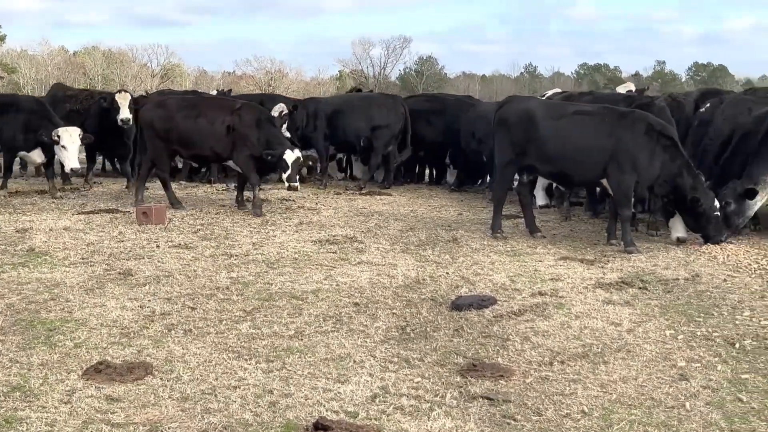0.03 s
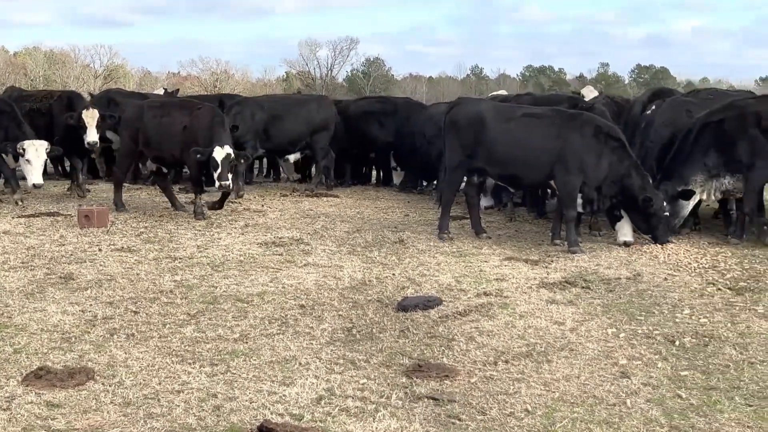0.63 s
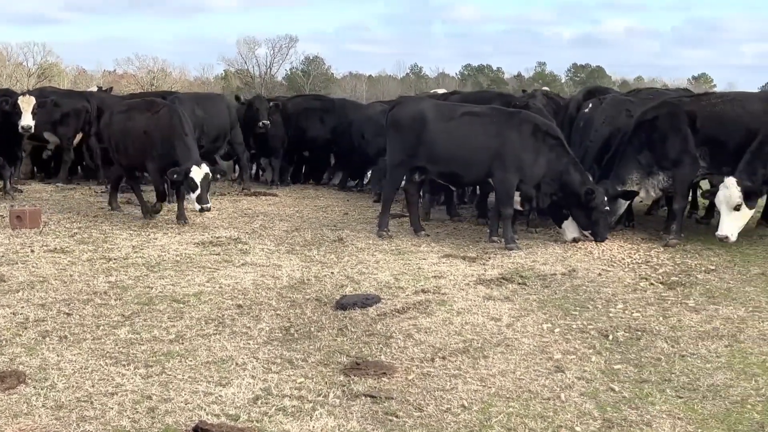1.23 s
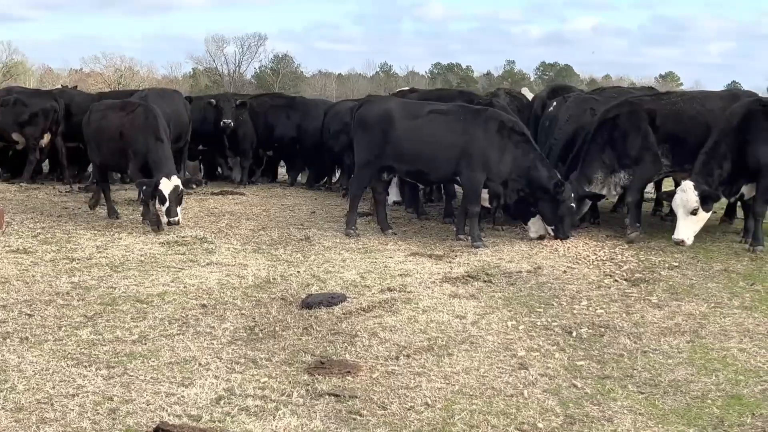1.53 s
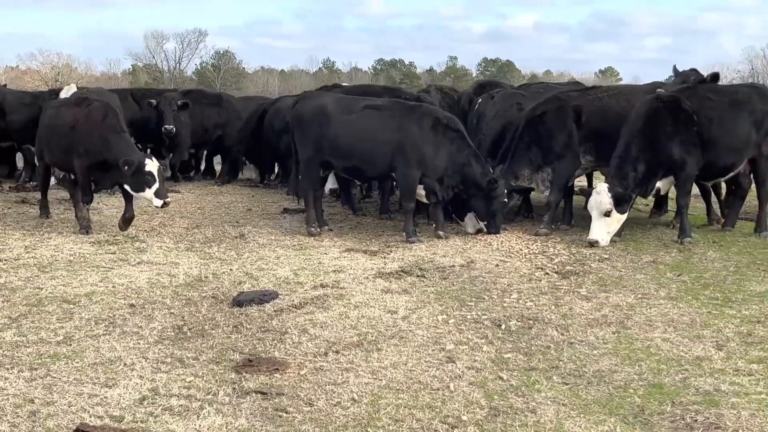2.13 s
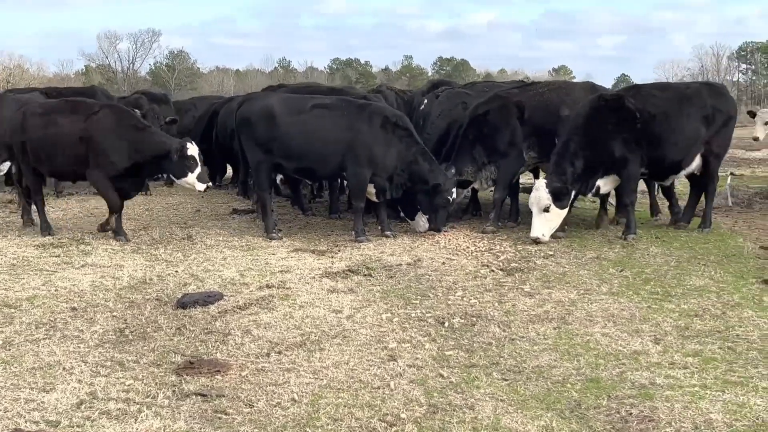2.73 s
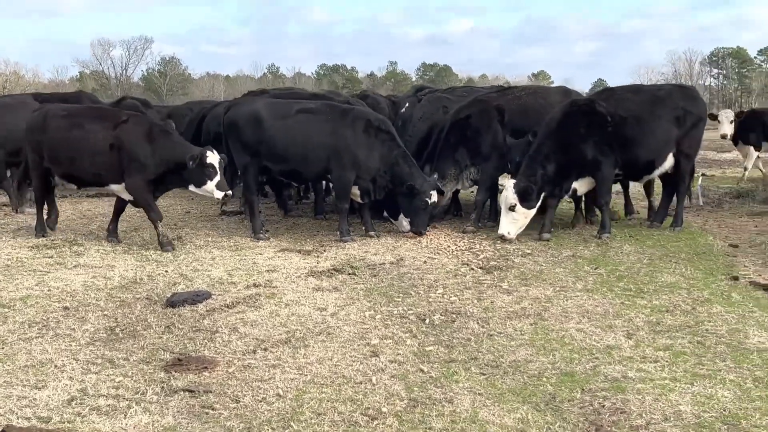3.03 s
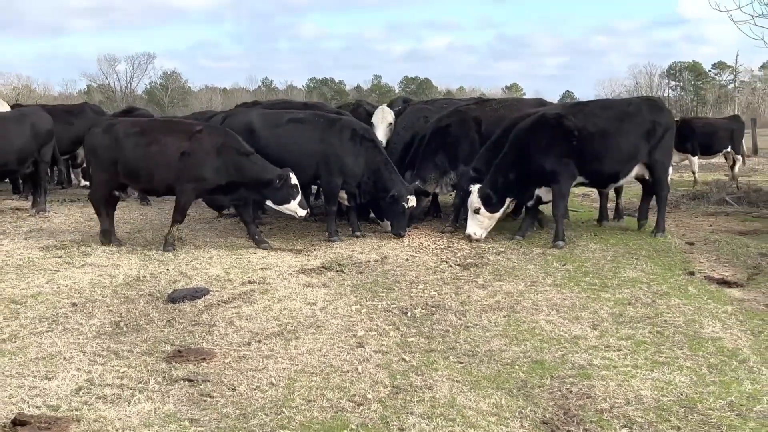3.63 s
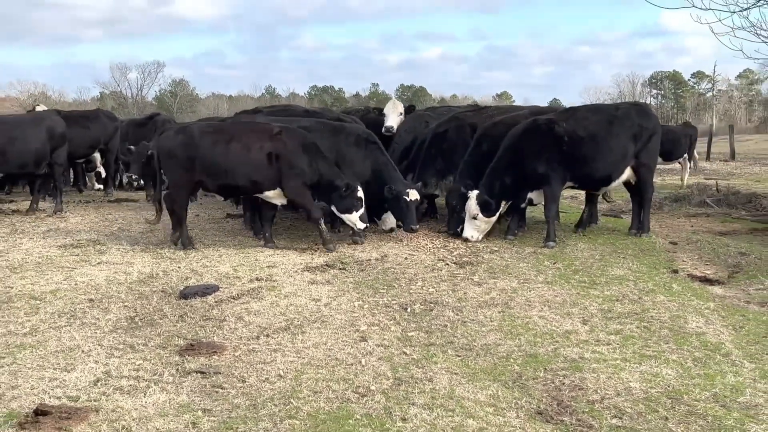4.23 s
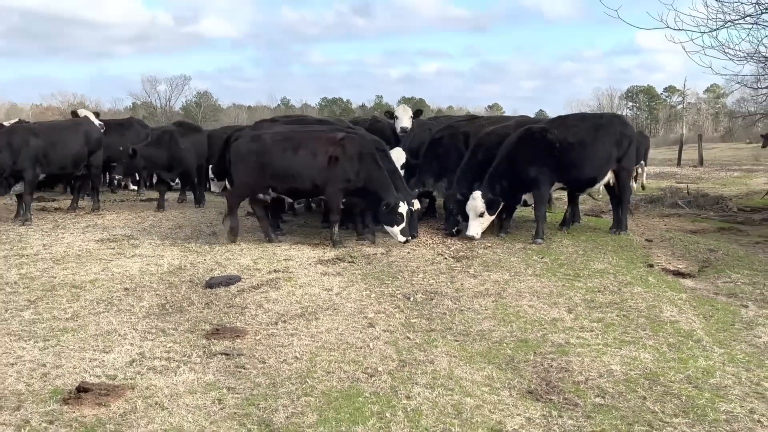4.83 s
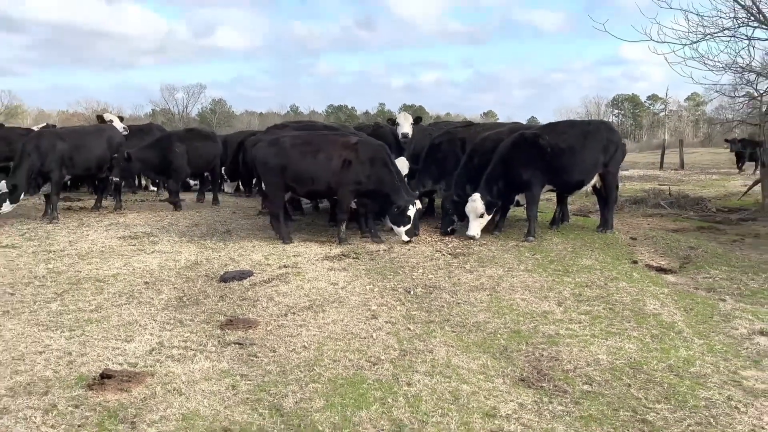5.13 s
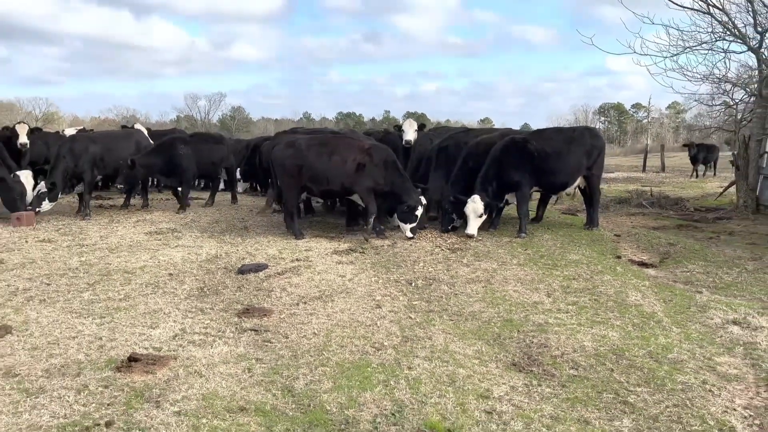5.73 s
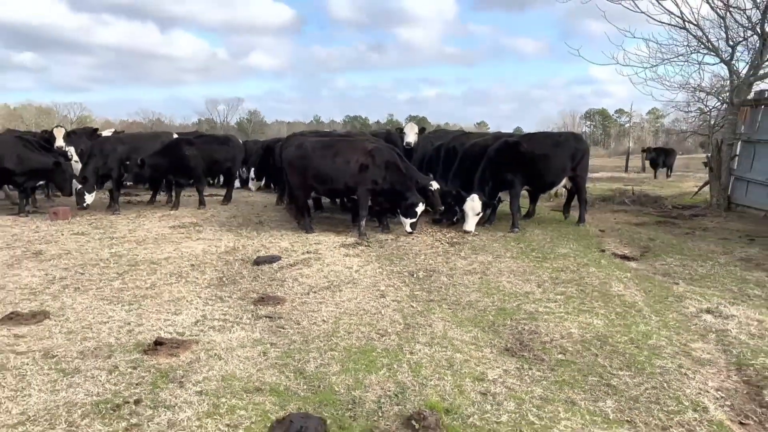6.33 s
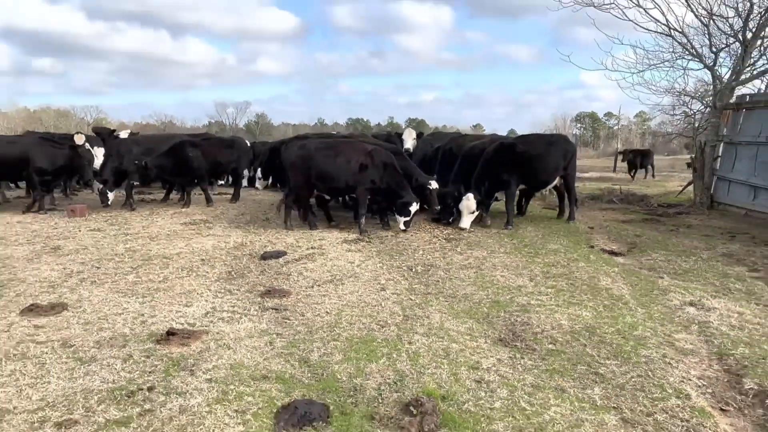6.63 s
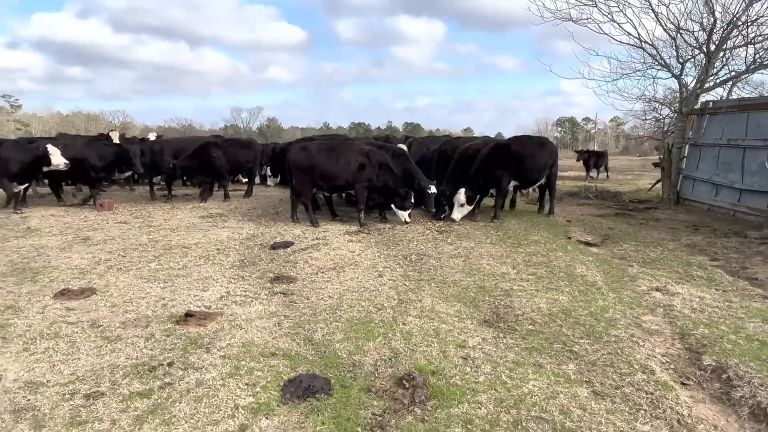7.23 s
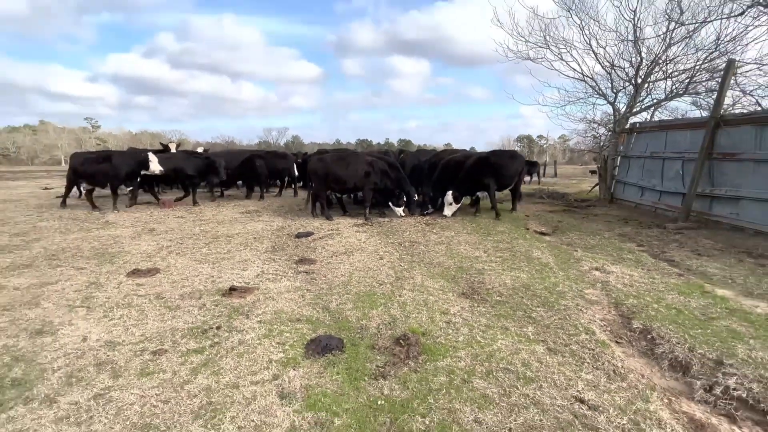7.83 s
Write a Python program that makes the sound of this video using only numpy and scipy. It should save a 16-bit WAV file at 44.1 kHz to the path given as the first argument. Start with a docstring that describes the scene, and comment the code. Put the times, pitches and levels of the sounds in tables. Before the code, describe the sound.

A quad bike's single-cylinder engine is heard from the seat as it crosses an open, dry pasture. It drones briefly, slows to a thudding idle with light metal clatter, and grows quieter, then picks up again with a rasp and a grinding whine. Low thumps come as it jolts over rough ground. A breeze rumbles on the microphone, loose parts tick, grass crackles faintly and small birds call far off.

```python
"""A dry pasture, heard from the seat of a quad bike with a single-cylinder four-stroke engine.
The bike slows to a thudding idle, then picks up again. Each engine cycle puffs gas through the
silencer and shakes the metal; under load the drive grinds and whines. Tyres swish through grass,
the bike jolts over rough ground, loose parts tick, a breeze rumbles and small birds call far off."""
import sys
import numpy as np
from scipy import signal
from scipy.fft import rfft, irfft, next_fast_len
from scipy.io import wavfile
from scipy.ndimage import uniform_filter1d

SR = 44100
rng = np.random.default_rng(int(sys.argv[2]) if len(sys.argv) > 2 else 0)


def dump_mix(stems):
    """Bounce the given channels to the path in sys.argv[1] as a 16-bit WAV at rate SR."""
    frames = np.atleast_2d(stems).T  # one column per channel
    limited = np.clip(frames, -1, 1)  # hard clip at full scale
    pcm = np.round(limited * 32767).astype(np.int16)
    wavfile.write(sys.argv[1], SR, pcm)


N = 351918
TIME = np.arange(N) / SR
SIZE = next_fast_len(N + SR // 10, True)
FREQ = np.maximum(np.arange(SIZE // 2 + 1) * SR / SIZE, 1)
CYCLE_DEG, MAX_CYCLES = 720, 256  # the crank turns twice for each firing


def undb(db):
    """Turn decibels into a gain."""
    return 10 ** (np.asarray(db) / 20)

def curve(table, column=1):
    """Join a table's points over time with straight lines."""
    table = np.asarray(table)
    return np.interp(TIME, table[:, 0], table[:, column])

def across(points):
    """Spread (Hz, value) points over every frequency."""
    hz, value = np.transpose(points)
    return np.interp(np.log(FREQ), np.log(hz), value)

def through(x, response):
    """Filter a sound with one gain for each frequency."""
    return irfft(rfft(x, SIZE) * response, SIZE)[..., :N]

def resonance(hz, width_hz):
    """A filter that rings at one pitch; the narrower, the longer it rings."""
    return 1 / (1 + 1j * (FREQ ** 2 - hz ** 2) / (FREQ * width_hz))

def unit(x, band_hz=(1, SR)):
    """Scale a sound so its mono mix has an rms level of 1 within a band."""
    mid = np.atleast_2d(x).mean(axis=0)
    return x / np.std(through(mid, (FREQ > band_hz[0]) & (FREQ < band_hz[1])))

def walk(rate):
    """A random wobble of about 1 that glides to a new value `rate` times a second."""
    hold = max(int(SR / rate), 1)
    steps = uniform_filter1d(np.repeat(rng.standard_normal(N // hold + 1), hold), hold)[:N]
    return steps / np.std(steps)

def swells(table, column):
    """Total power of events that rise and fall in a bell shape."""
    t = TIME[::64]
    power = sum(undb(row[column]) ** 2 * np.exp(-((t - row[0]) / row[1]) ** 2) for row in table)
    return np.interp(TIME, t, power)

def wide_noise(width, n=N):
    """Noise shared by left and right, plus some of their own."""
    return rng.standard_normal(n) + width * rng.standard_normal((2, n))

def stereo_noise(envelope, colour, likeness, balance):
    """Noise that follows an envelope, shaped in tone and spread left and right."""
    alike = np.clip(across(likeness), -.8, .99)
    lean = undb(across(balance) / 2)
    gain = undb(across(colour)) / np.sqrt(lean ** 2 + lean ** -2 + 2 * alike)
    mid, side = envelope * rng.standard_normal((2, N))
    centre = through(mid, gain * np.sqrt(1 + alike) * [lean, 1 / lean])
    return centre + through(side, gain * np.sqrt(1 - alike) * [lean, -1 / lean])

def tone(pitch_hz):
    """A sine wave that follows a changing pitch."""
    return np.sin(2 * np.pi * np.cumsum(pitch_hz) / SR)

def add(track, start_s, sound):
    """Mix a short sound into a track."""
    start = max(int(start_s * SR), 0)
    track[..., start:start + sound.shape[-1]] += sound[..., :N - start]

def strengths(scatter_db):
    """One random gain for each engine cycle."""
    return undb(scatter_db * rng.uniform(-1, 1, size=MAX_CYCLES))

def rattling(cycle, taps, loose, settle_s):
    """Loose metal taps a little early or late, harder or softer, and chatters briefly."""
    strikes = np.zeros(N)
    for angle, strength in taps:
        angles = angle + 9 * rng.standard_normal(MAX_CYCLES)
        at = np.searchsorted(cycle, np.arange(MAX_CYCLES) + angles / CYCLE_DEG)
        inside = (at > 0) & (at < N)
        strikes[at[inside]] += strength * strengths(scatter_db=4)[inside]
    fade = np.exp(-1 / (settle_s * SR))
    chatter = np.sqrt(signal.lfilter([1 - fade], [1, -fade], strikes ** 2 + 1e-18))
    return strikes + loose * chatter * rng.standard_normal((2, N))

def ringing(shake, rings, wander_db):
    """Shaken metal rings; each pitch comes and goes as the parts shift."""
    return unit(sum(through(shake, undb(db) * resonance(hz, width) ** 2) * undb(wander_db * walk(4))
                    for hz, width, db in rings))

# Engine speed. Each row: time in seconds, firings per second.
ENGINE_SPEED = [(0.0, 21.75), (0.45, 22.8), (0.62, 21.49), (0.75, 20.22), (0.87, 18.12), (1.07, 16.91),
                (1.75, 15.95), (2.0, 16.16), (2.2, 16.24), (2.4, 15.47), (2.65, 15.47), (3.1, 15.41),
                (3.65, 15.24), (4.0, 15.44), (4.45, 14.91), (5.2, 14.43), (5.7, 15.22), (6.0, 16.26),
                (6.25, 19.94), (6.48, 21.64), (6.75, 19.7), (7.1, 22.51), (7.42, 23.05), (7.68, 23.12),
                (7.98, 22.03)]

def revs(idle_hz=15.5):
    """Engine speed in octaves above idle: 1 means twice as fast."""
    return np.log2(curve(ENGINE_SPEED) / idle_hz)

# Bird calls. Each row: start in seconds, length in seconds, pitch in Hz, fall in octaves, level in dB.
WHISTLES = [(3.345, .18, 2670, .24, -61), (3.83, .17, 2650, .05, -61.5)]

def whistling_bird(rise_oct=.14):
    """Two soft whistles rise, hold and drop at the end."""
    out = np.zeros(N)
    for start, length, hz, fall, db in WHISTLES:
        progress = np.linspace(0, 1, int(length * SR))
        bend = -rise_oct * (1 - progress) ** 2 - fall * progress ** 6
        pitch = hz * 2 ** (bend + .013 * walk(270)[:len(progress)])
        add(out, start, undb(db) * np.sqrt(4 * progress * (1 - progress)) * tone(pitch))
    return out

# Bird trills. Each row: start in seconds, length in seconds, pitch in Hz, level in dB.
TRILLS = [(.472, .05, 6460, -60), (3.575, .045, 5900, -61), (3.775, .065, 6330, -57),
          (4.035, .085, 5420, -60)]

def trilling_bird(pips_per_s=50, sweep_oct=.082):
    """A smaller bird sings thin runs of quick, falling pips that fade."""
    out = np.zeros(N)
    for start, length, hz, db in TRILLS:
        t = TIME[:int(length * SR)]
        pip = t * pips_per_s % 1
        pitch = hz * 2 ** (sweep_oct * (.5 - pip) + .043 * walk(1500)[:len(t)])
        pulses = .49 + 1.36 * np.sin(np.pi * pip) ** 2
        add(out, start, undb(db) * np.sqrt(1 - t / length) * pulses * tone(pitch))
    return out

# Small cracks. Each row: start in seconds, peak level in dB, pitch in Hz.
TICKS = [(1.481, -38, 3280), (1.527, -44, 3420), (1.62, -40.5, 1940), (1.987, -47, 6900),
         (2.155, -44, 4800), (2.56, -30.5, 1750), (2.819, -33.5, 2100), (3.195, -47, 9000),
         (3.704, -45, 3900), (4.645, -45, 4440), (4.922, -58, 11000), (5.05, -52, 7300), (5.327, -37, 2300),
         (5.33, -43, 4350), (5.885, -38, 4100), (6.728, -50, 10500), (6.759, -43, 9500),
         (6.834, -42.5, 11100), (7.399, -46.5, 10000)]

def ticks():
    """Loose parts and snapping stalks make brief, bright bursts of noise."""
    out, t = np.zeros((2, N)), TIME[:SR // 20]
    for start, db, hz in TICKS:
        burst = wide_noise(.6, len(t)) * np.exp(-t / .0031)
        band = signal.butter(2, [hz * .7, hz * 1.13], "band", fs=SR, output="sos")
        crack = signal.sosfilt(band, burst)
        add(out, start, crack / np.abs(crack).max() * undb(db))
    return out

def boom(length_s=.03, start_hz=102.5, end_hz=53.5):
    """One short, low boom slides down in pitch at the very start."""
    out, progress = np.zeros(N), np.linspace(0, 1, int(length_s * SR))
    pitch = start_hz * (end_hz / start_hz) ** progress
    swell = np.sqrt(4 * progress * (1 - progress)) * (1 - progress / 2)
    add(out, 0, undb(-24.5 + 2 * walk(27)[:len(progress)]) * swell * tone(pitch))
    return out

def slap(hz):
    """One quick swing of pressure; the higher its pitch, the shorter it is."""
    turns = hz * TIME[:SR // 10]
    return -6.5 * np.sin(2 * np.pi * turns) * turns * np.exp(-turns / .49)

# Jolts. Each row: time in seconds, thump level in dB, slap level in dB, slap pitch in Hz.
JOLTS = [(.009, -12.5, -36, 260), (.036, -10.5, -43, 250), (.057, -17, -33.5, 285),
         (1.889, -16, -30.5, 332), (1.91, -27, -26.5, 540), (1.923, -8, -21, 297), (1.971, -15, -35, 270),
         (2.161, -11.5, -25.5, 280), (2.198, -23, -38, 260), (2.615, -17, -30, 400),
         (2.646, -13.5, -20.5, 415), (2.662, -5.5, -25, 304), (2.685, -14, -21, 347),
         (2.891, -16.5, -22, 266), (2.957, -24, -24.5, 290), (3.01, -20, -21, 336),
         (3.028, -19, -24.5, 272), (3.157, -11, -13, 296), (3.168, -17, -25.5, 340),
         (3.21, -25, -30.5, 297), (3.28, -16, -34, 247), (3.525, -13.5, -30.5, 297), (3.687, -18, -40, 277),
         (3.727, -26, -32.5, 513), (3.805, -15, -24.5, 315), (3.87, -21, -36, 260),
         (4.319, -11.5, -21, 261), (4.419, -18.5, -46, 277), (4.554, -23, -21.5, 378),
         (4.566, -23, -23, 420), (4.584, -13.5, -19, 277), (4.611, -7, -13.5, 280),
         (4.623, -10, -16.5, 320), (4.642, -12.5, -23.5, 293), (4.786, -12, -21, 287),
         (4.805, -8, -31, 280), (4.838, -4.5, -12, 370), (4.885, -43, -26.5, 520), (4.94, -39, -37, 480),
         (5.068, -38, -27, 490), (5.135, -22, -29, 390), (5.237, -29.5, -27.5, 503), (5.3, -34, -26.5, 525),
         (5.324, -38, -35, 487), (5.6, -19.5, -32.5, 400), (6.146, -27, -32.5, 372)]

def jolts(flutter_gain, small_per_s=14, lead_s=.03, rise_s=.0052, fall_s=.015):
    """The bike bumps over rough ground with a low thump and a slap; listed jolts also shudder."""
    small_jolts = (rng.random(N) < small_per_s / SR) * rng.uniform(-1.4, 1, N) * flutter_gain
    thumps = undb(6) * small_jolts
    slaps = through(undb(1) * small_jolts, rfft(slap(330), SIZE))
    shudder_gain, t = np.zeros(N), TIME[:SR // 10]
    swell = np.exp(np.minimum((t - lead_s) / rise_s, (lead_s - t) / fall_s))
    for start, thump_db, slap_db, hz in JOLTS:
        thumps[int(start * SR)] += undb(thump_db)
        add(slaps, start, undb(slap_db) * slap(hz))
        add(shudder_gain, start - lead_s, undb(slap_db) * swell)
    thump = .8 * np.sin(2 * np.pi * 170 * t) * np.exp(-t / .0072)
    push = .36 * np.sin(2 * np.pi * 66 * t) * np.exp(-t / .019)
    shudder = unit(through(wide_noise(.5), resonance(261, 150) ** 2))
    hits = through(thumps, rfft(thump + push, SIZE)) + slaps
    muffle = 1 / np.sqrt(1 + (FREQ / 780) ** 8)  # takes away the treble
    return through(hits + undb(-10) * shudder_gain * shudder, muffle)

# The tone of the rumble and the flutter. Each row: frequency in Hz, level in dB.
RUMBLE_COLOUR = [(18, -43), (35, -6), (60, 3), (85, 7), (130, -1), (300, -19), (500, -82)]
FLUTTER_COLOUR = [(90, 7), (200, 15.5), (330, 7.5), (500, -1), (750, -9), (1100, -16.5), (1600, -64.5)]
# Steady breeze. Each row: time in seconds, rumble in dB, flutter in dB.
BREEZE = [(0, -36, -58), (.9, -40.5, -57), (1.75, -39, -52.5), (2.05, -36.5, -54.5), (3.0, -33, -54),
          (4.3, -36, -54.5), (5.0, -43, -64.5), (6.9, -55.5, -50.5), (7.98, -45, -57.5)]
# Swells over bumps. Each row: middle in seconds, half length in seconds, rumble in dB, flutter in dB.
BUMP_SWELLS = [(.04, 0.076, -24.5, -44.5), (1.93, 0.035, -24.5, -47.5), (2.58, 0.17, -36, -46),
               (3.03, 0.23, -30.5, -55), (3.76, 0.092, -38, -45.5), (4.6, 0.045, -25.5, -50.5),
               (4.86, 0.1, -42, -45), (5.08, 0.1, -58, -47.5), (5.27, 0.21, -61, -48.5),
               (5.58, 0.033, -54, -49), (6.22, 0.17, -39.5, -48.5)]

def breeze_and_bumps():
    """Over a steady breeze, low rumble and flutter swell as the bike rides over bumps."""
    rumble_gain = np.sqrt(undb(curve(BREEZE)) ** 2 + swells(BUMP_SWELLS, column=2))
    flutter_gain = np.sqrt(undb(curve(BREEZE, column=2)) ** 2 + swells(BUMP_SWELLS, column=3))
    rumble = unit(through(wide_noise(.15), undb(across(RUMBLE_COLOUR))), band_hz=(25, 62))
    flicker = wide_noise(1.42) * undb(3 * walk(90))
    flutter = unit(through(flicker, undb(across(FLUTTER_COLOUR))), band_hz=(400, 800))
    return rumble * rumble_gain + undb(-2) * flutter * flutter_gain + jolts(flutter_gain)

# The tone of the hiss. Each row: frequency in Hz, level in dB.
HISS_COLOUR = [(240, -53), (400, 0.5), (448, 5), (605, -5), (739, 0), (807, -1), (1100, -5.5), (1400, -8.5),
               (1800, -9.5), (2720, -10.5), (3680, -9.5), (5290, -12.5), (8000, -34.5), (10400, -56),
               (17600, -120)]
# Its width. Each row: frequency in Hz, how alike left and right are (higher is more alike).
HISS_LIKENESS = [(60, 0.91), (130, 0.93), (290, 0.79), (630, -0.58), (1370, -0.3), (2990, 0.89),
                 (6530, 0.12), (14300, -0.022)]
# Its lean to one side. Each row: frequency in Hz, left minus right in dB.
HISS_BALANCE = [(60, 2.5), (110, 1), (200, 6), (370, 8), (680, -7.5), (1250, 0), (2300, 5), (4230, 3),
                (7770, 14.5), (14300, -3)]

def hiss(envelope):
    """Broad rushing noise, for both the grass and the drive."""
    return unit(stereo_noise(envelope, HISS_COLOUR, HISS_LIKENESS, HISS_BALANCE), band_hz=(3300, 5600))

# The tone of dry stalks. Each row: frequency in Hz, level in dB.
GRASS_COLOUR = [(1500, -10), (3000, -13), (6000, 3), (7300, 2.5), (8300, -20), (9600, 1.5), (11500, -1),
                (14500, -7.5)]
# Tufts. Each row: middle in seconds, half length in seconds, crackle in dB, swish in dB.
TUFTS = [(.1, 0.11, -70, -70), (.97, 0.084, -71.5, -70), (2.5, 0.14, -65, -60.5), (5.3, 0.018, -69.5, -69),
         (5.6, 0.06, -71.5, -67), (5.89, 0.038, -70, -69), (6.42, 0.24, -70.5, -70), (6.84, 0.12, -68, -67)]

def grass(snaps_per_s=120, snap_s=.00065):
    """Dry stalks crackle under the tyres, more with speed; taller tufts swish past."""
    snaps = (rng.random(N) < snaps_per_s / SR) * undb(np.minimum(4 * rng.exponential(size=N), 14))
    fade = np.exp(-1 / (snap_s * SR))
    crush = undb(2 * walk(1500) + 1.8 * walk(40)) + 1.1 * signal.lfilter([1], [1, -fade], snaps)
    crackle = stereo_noise(crush, GRASS_COLOUR, HISS_LIKENESS, CLATTER_BALANCE)
    crackle_gain = np.sqrt(undb(-74 + 8 * revs()) ** 2 + swells(TUFTS, column=2))
    swish = hiss(crush) * np.sqrt(swells(TUFTS, column=3))
    return unit(crackle, band_hz=(9500, 14000)) * crackle_gain + swish

# Swells of grinding. Each row: middle in seconds, half length in seconds, level in dB.
GRINDS = [(.35, 0.45, -57), (6.3, 0.083, -60), (6.76, 0.12, -49), (7.88, 0.23, -58.5)]
# How the drive rings. Each row: pitch in Hz, width in Hz, level in dB.
DRIVE_RINGS = [(767, 110, -5.5), (940, 170, 3.5), (1068, 130, -0.5)]

def grind():
    """The drive to the wheels grinds near 1000 Hz, most of all as it takes up the load."""
    rub = wide_noise(.62) * undb(2.2 * walk(120))
    gain = np.sqrt(swells(GRINDS, column=2)) * undb([[-3], [2.5]])  # louder on the right
    return ringing(rub, DRIVE_RINGS, wander_db=3.5) * gain

# Mechanical knocks inside the engine, three in each cycle.
# Each row: crank angle in degrees, fade in degrees, strength.
KNOCKS = [(-64, 570, 3), (38.5, 360, 1.4), (399.5, 60, 0.18)]

def knocking(cycle, scatter_db):
    """The force of the knocks inside the engine: each starts at once and dies away."""
    force = 0
    for angle, fade, strength in KNOCKS:
        number, since = np.divmod(cycle - angle / CYCLE_DEG + 1, 1)
        peak = strength * strengths(scatter_db)[number.astype(int)]
        force += peak * np.exp(-since * CYCLE_DEG / fade)
    return force

def load_db(start_s=5.63, rise_s=.884, ease_s=.14, pull_db=10.5, cruise_db=6.5):
    """Extra rasp as the bike pulls away: the load comes on, then eases."""
    rise = np.clip((TIME - start_s) / rise_s, 0, 1)
    ease = np.exp(-np.maximum(TIME - start_s - rise_s, 0) / ease_s)
    return rise * (cruise_db + (pull_db - cruise_db) * ease)

# Guards bounce on their mounts. Each row: crank angle in degrees, strength.
GUARD_TAPS = [(-72, 1.0), (-42, 1.6), (15, 1.0), (85, 1.0), (450, .7)]
# How they ring. Each row: pitch in Hz, width in Hz, level in dB.
GUARD_RINGS = [(1620, 140, 3), (2040, 280, 8), (2650, 200, 0), (3230, 200, 2), (3660, 260, 7),
               (3930, 180, 3), (5080, 100, 7), (5300, 320, 1.5)]
# Gear whine. Each row: multiple of the firing rate, level within the rasp in dB.
GEAR_WHINE = [(32, -4), (47, -2.5)]

def rasp(cycle):
    """Under load the drive hisses and whines, and thin guards buzz with each firing."""
    rush = hiss((4 + knocking(cycle, scatter_db=1.5)) * undb(1.8 * walk(400)))
    buzz = ringing(rattling(cycle, GUARD_TAPS, loose=1, settle_s=.003), GUARD_RINGS, wander_db=2.5)
    whine = sum(undb(db + 2.9 * walk(4.9)) * np.sin(2 * np.pi * multiple * cycle + 1.2 * walk(40))
                for multiple, db in GEAR_WHINE)
    return (undb(2.5) * rush + undb(.5) * buzz + whine) * undb(-71.5 + 9 * revs() + load_db())

# Levels at idle speed, lower once the microphone turns away from the engine.
# Each row: time in seconds, exhaust in dB, clatter in dB.
IDLE_LEVELS = [(0, -17.5, -48), (1.1, -21, -55.5), (2.7, -21.5, -54.5), (3.3, -22.5, -61),
               (4.0, -22, -60.5), (4.55, -28.5, -63.5), (5.05, -36.5, -67.5), (5.35, -32, -64),
               (5.8, -37, -65.5), (6.55, -25.5, -57.5), (7.2, -27, -68.5), (7.98, -27, -63)]

def engine_gain(column, db_per_octave):
    """The engine gets louder the faster it runs."""
    return undb(curve(IDLE_LEVELS, column) + db_per_octave * revs())

# The tone of the engine's churn. Each row: frequency in Hz, level in dB.
CLATTER_COLOUR = [(260, -35), (450, -11), (477, -23.5), (520, -8), (701, -7.5), (834, -3), (927, -10),
                  (1070, -2.5), (1590, -7), (1750, -4), (2410, -13.5), (3610, -18.5), (4500, -42),
                  (5850, -60), (9900, -120)]
# Its width. Each row: frequency in Hz, how alike left and right are (higher is more alike).
CLATTER_LIKENESS = [(60, -2.2), (130, -2), (290, -4.5), (630, -3), (1370, -2.07), (2990, 4), (6530, -0.5),
                    (14300, -1.5)]
# Its lean, shared by the grass crackle. Each row: frequency in Hz, left minus right in dB.
CLATTER_BALANCE = [(60, 6), (110, 3), (200, 0.5), (370, 6.5), (680, -3.5), (1250, -15.5), (2300, -5),
                   (4230, -1), (7770, -1), (14300, 0.5)]
# Taps of the piston and the valves. Each row: crank angle in degrees, strength.
PISTON_TAPS = [(-35, 1.1), (0, 1.7), (45, 1.3), (100, 1.7), (545, .6)]
VALVE_TAPS = [(-55, .7), (-10, 1), (360, .6), (525, .9)]
# How the casing and the valve cover ring. Each row: pitch in Hz, width in Hz, level in dB.
CASING_RINGS = [(1255, 130, -8), (1580, 60, -1), (1750, 65, 5), (1810, 130, -3), (2060, 200, -7)]
COVER_RINGS = [(3520, 260, 0), (3700, 260, -1), (5150, 600, -9)]
# The casing's part in the clatter. Each row: time in seconds, level in dB.
CASING_LEVEL = [(0, -1), (1.2, -3), (1.6, -0.5), (2.35, -5), (2.9, 3), (3.6, -1.5), (5.6, -5), (6.4, -4.5),
                (7.98, -1)]

def clatter(cycle):
    """The piston and valves rattle the metal around them over the engine's steady churn."""
    shake = (2 + knocking(cycle, scatter_db=4)) * undb(2.2 * walk(500))
    churn = stereo_noise(shake, CLATTER_COLOUR, CLATTER_LIKENESS, CLATTER_BALANCE)
    churn = undb(1) * unit(churn, band_hz=(1100, 2200))
    piston = rattling(cycle, PISTON_TAPS, loose=.8, settle_s=.002)
    casing = undb(curve(CASING_LEVEL)) * ringing(piston, CASING_RINGS, wander_db=2.5)
    valves = rattling(cycle, VALVE_TAPS, loose=.6, settle_s=.002)
    cover = undb(-15) * ringing(valves, COVER_RINGS, wander_db=4)
    return (churn + casing + cover) * engine_gain(column=2, db_per_octave=2)

def puff(cycle, angle, spread):
    """A bell-shaped push of gas, once a cycle, around a crank angle."""
    position = cycle - angle / CYCLE_DEG + 1
    nearest = np.round(position).astype(int)
    bell = np.exp(-((position - nearest) * CYCLE_DEG / spread) ** 2 / 2)
    return strengths(scatter_db=1.8)[nearest] * bell / spread

# Puffs of gas in one cycle. Each row: crank angle in degrees, spread in degrees,
# amount at idle (negative sucks in), amount gained each time the speed doubles.
PUFFS = [(-9, 11, 0.062, 0.21), (105, 19.3, 0.142, 0.006), (203, 15.5, -0.067, .115), (375, 41, -0.33, .2)]

def gas_flow(cycle, bark=.14):
    """Gas bursts out, is swept out by the piston and gulped in; opening the throttle adds a bark."""
    octaves = revs()
    flow = sum((amount + growth * octaves) * puff(cycle, angle, spread)
               for angle, spread, amount, growth in PUFFS)
    throttle = np.maximum(uniform_filter1d(np.gradient(octaves) * SR, SR // 4), 0)  # rise in speed
    burst_angle, burst_spread = PUFFS[0][:2]
    return flow + bark * throttle * puff(cycle, burst_angle, burst_spread)

# How the hot exhaust pipe rings. Each row: pitch in Hz, width in Hz, share (negative flips the wave).
PIPE_RINGS = [(71.2, 13, -0.29), (116.4, 9, -0.33), (133.4, 20, 0.72), (232.8, 16, 0.71), (232, 90, 0.14),
              (266.6, 17, 0.65)]

def pipe(pitch_ratio, width_ratio, silencer_width_hz, silencer_hz=104):
    """The pipe and silencer as one filter; cooler gas lowers and widens the pipe's rings."""
    rings = sum(share * resonance(hz * pitch_ratio, width * width_ratio)
                for hz, width, share in PIPE_RINGS)
    return rings * resonance(silencer_hz, silencer_width_hz)

def exhaust(cycle, hot_octaves=.55):
    """Puffs ring the pipe: a short, low thud at idle, a higher drone once the gas runs hot."""
    flow = gas_flow(cycle)
    hot = through(flow, pipe(pitch_ratio=1, width_ratio=1, silencer_width_hz=26))
    cool = through(flow, pipe(pitch_ratio=.93, width_ratio=1.8, silencer_width_hz=38))
    heat = np.clip(revs() / hot_octaves, 0, 1)
    thud = heat * hot + (1 - heat) * cool
    power = uniform_filter1d(uniform_filter1d(thud ** 2, SR // 5), SR // 5)
    delay = np.exp(-2j * np.pi * FREQ * np.array([[.00036], [0]]))  # the left hears it a little later
    even_thud = through(thud / np.sqrt(power), delay) * undb([[1], [-.6]])
    return even_thud * engine_gain(column=1, db_per_octave=4.5)

def scene():
    """One count of engine cycles keeps exhaust, clatter and rasp in step; the field has no echo."""
    cycle = .597 + np.cumsum(curve(ENGINE_SPEED)) / SR
    bike = exhaust(cycle) + clatter(cycle) + rasp(cycle) + grind()
    return bike + grass() + breeze_and_bumps() + boom() + ticks() + whistling_bird() + trilling_bird()

def record(dry, low_hz=28, top_hz=14900):
    """Cut away the deepest bass and the highest treble."""
    dry = signal.sosfilt(signal.butter(3, low_hz, "high", fs=SR, output="sos"), dry)
    return signal.sosfilt(signal.ellip(8, .2, 70, top_hz, fs=SR, output="sos"), dry)


dry = scene()
out = record(dry)
dump_mix(out)
```